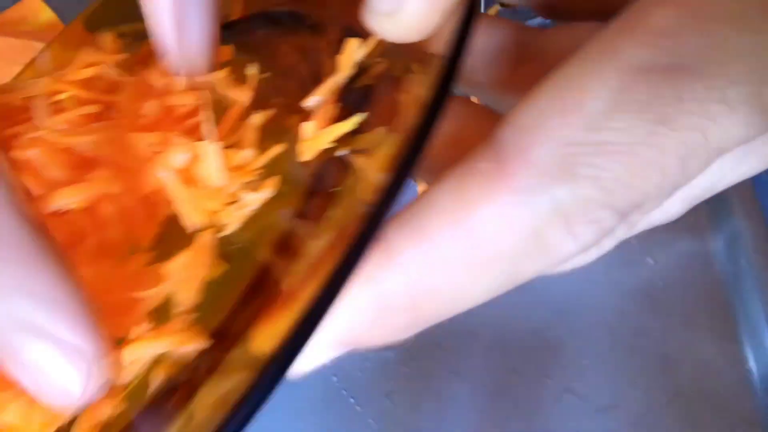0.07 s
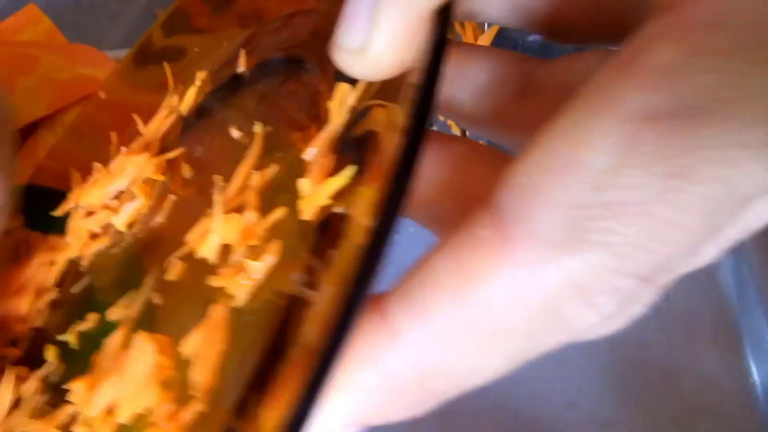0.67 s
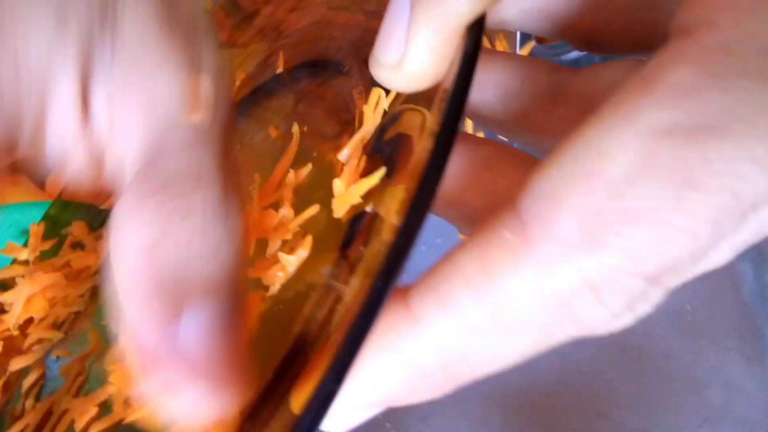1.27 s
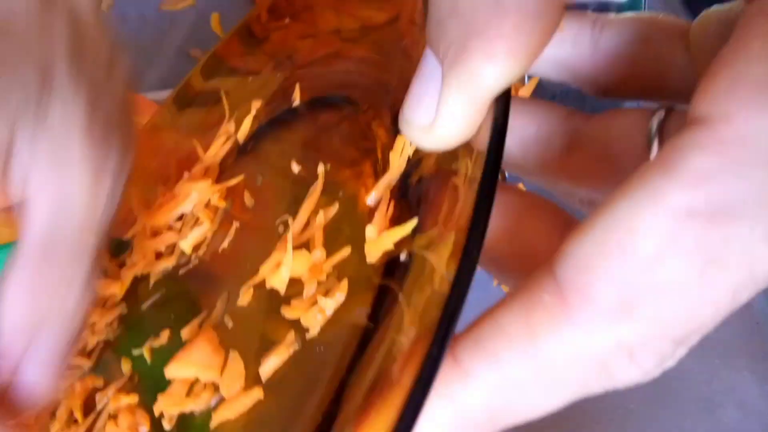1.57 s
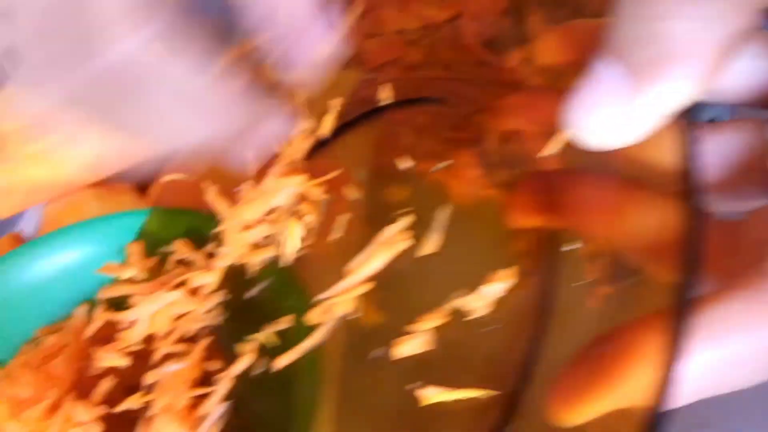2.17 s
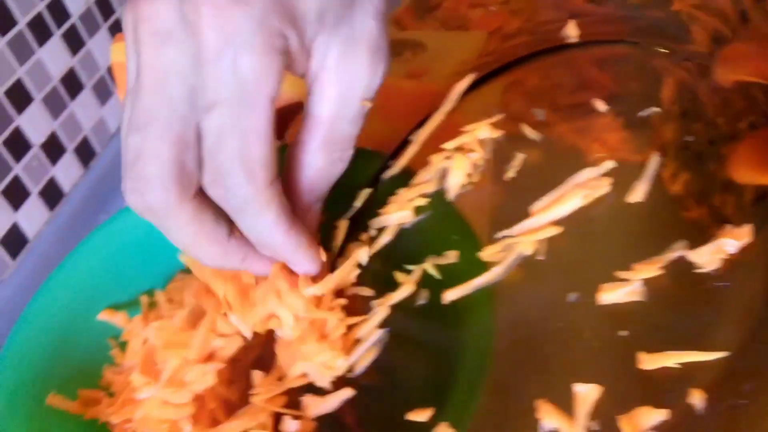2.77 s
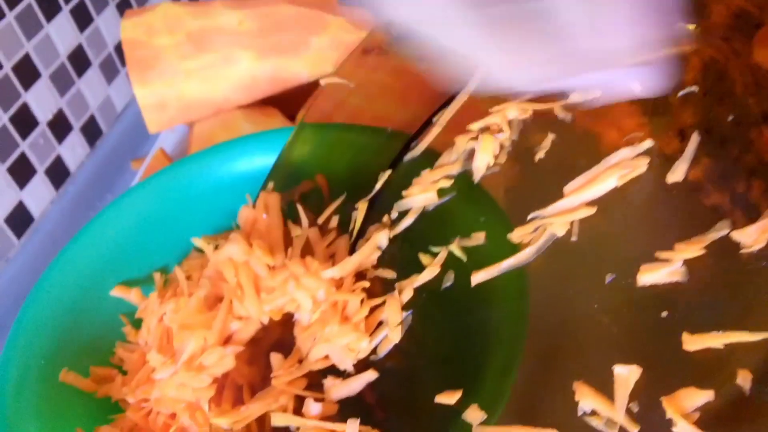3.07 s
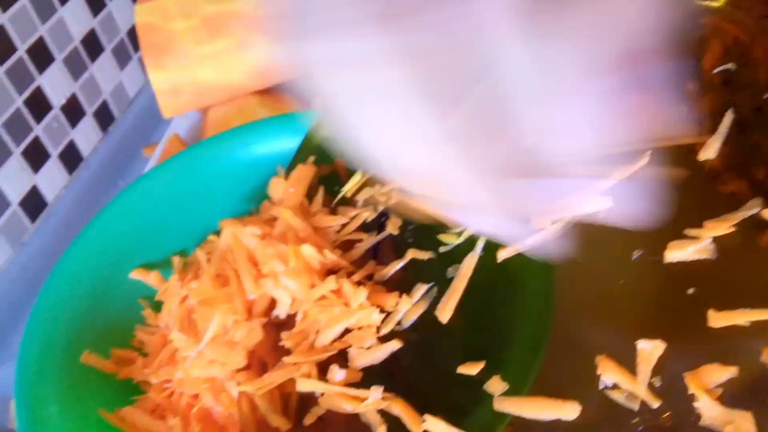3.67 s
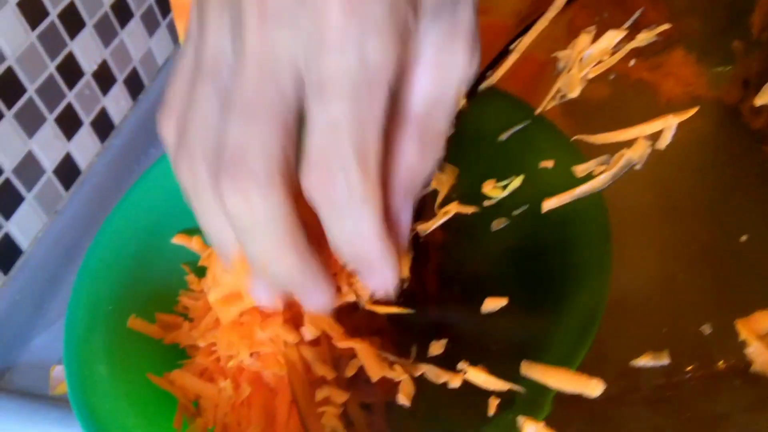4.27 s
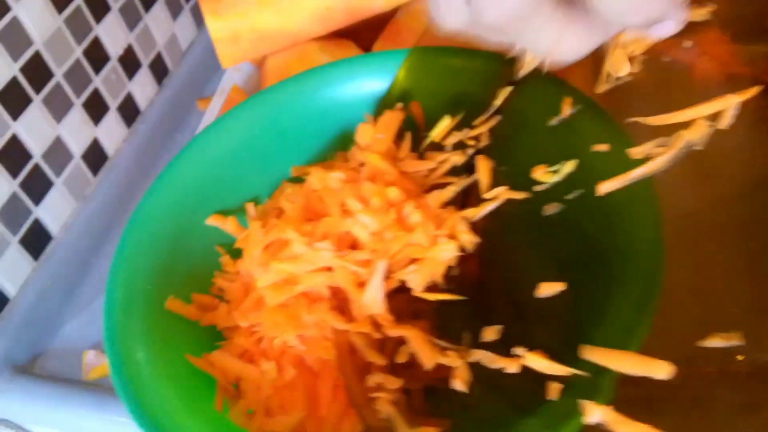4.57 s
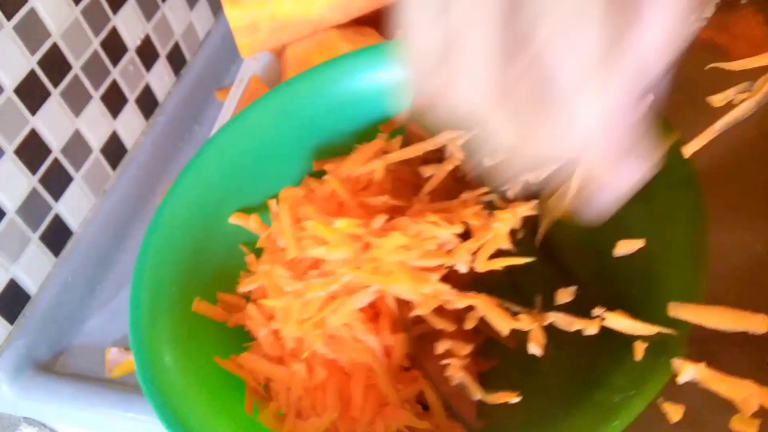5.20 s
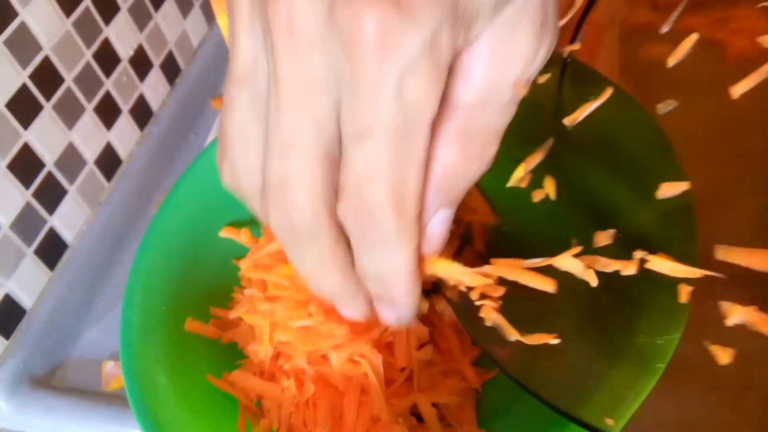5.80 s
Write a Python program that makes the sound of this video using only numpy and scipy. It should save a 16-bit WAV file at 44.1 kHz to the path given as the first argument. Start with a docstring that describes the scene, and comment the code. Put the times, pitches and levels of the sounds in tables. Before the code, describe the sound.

Glass bowl clatters and scrapes, then knocks lightly on a plastic bowl as wet fingers wipe out grated vegetable.

```python
"""Scooping grated pumpkin between bowls.

In a small tiled kitchen, a hand scoops grated pumpkin from a tilted glass bowl into a plastic one,
where it lands with a soft thud. The glass is shifted with a clatter and a squealing scrape, knocks
on the plastic, and rings faintly as wet fingers wipe it. A thin whistle rises and falls at the end,
over quiet room noise."""
import sys
import numpy as np
from scipy import signal
from scipy.fft import rfft, irfft, next_fast_len
from scipy.io import wavfile
from scipy.ndimage import uniform_filter1d, map_coordinates

SR = 44100
rng = np.random.default_rng(int(sys.argv[2]) if len(sys.argv) > 2 else 0)


def wrap_up_sound(samples):
    """Save the sound to the file named by the first command line argument, as 16-bit audio."""
    columns = np.atleast_2d(samples).T
    # keep every value between -1 and 1, then stretch to whole-number steps
    tamed = np.clip(columns, -1, 1)
    steps = np.round(tamed * 32767).astype(np.int16)
    wavfile.write(sys.argv[1], SR, steps)


N = 266319
TIME_S = np.arange(N) / SR
AGE_S = np.arange(SR // 3) / SR  # time within one impact


def amp(db):
    """Decibels to gain."""
    return 10 ** (np.asarray(db) / 20)


def unit_rms(x):
    """x at rms 1."""
    return x / np.sqrt(np.mean(x ** 2) + 1e-20)


def unit_hit(x):
    """x with the energy of 10 ms at rms 1."""
    return x / np.sqrt(np.sum(x ** 2) / (SR / 100) + 1e-20)


def log_interp(points, hz):
    """(f/Hz, value) points read on a log frequency axis."""
    point_hz, values = np.transpose(points)
    return np.interp(np.log(hz + 1), np.log(point_hz + 1), values)


def wobble(knots_per_s):
    """Smooth random curve."""
    knots = rng.standard_normal(int(N * knots_per_s / SR) + 4)
    return map_coordinates(knots, [TIME_S * knots_per_s])


def filtered(x, gain):
    """x through a minimum-phase filter of magnitude gain(hz)."""
    size = 2 * next_fast_len(len(x) // 2 + 4096)
    magnitude = np.maximum(gain(np.fft.rfftfreq(size, 1 / SR)), 1e-6)
    cepstrum = irfft(np.log(magnitude))
    cepstrum[1:size // 2] *= 2
    cepstrum[size // 2 + 1:] = 0
    return irfft(rfft(x, size) * np.exp(rfft(cepstrum)))[:len(x)]


def coloured(x, spectrum):
    """x through an (f/Hz, gain/dB) curve."""
    return filtered(x, lambda hz: amp(log_interp(spectrum, hz)))


def focused(x, centre_hz, width_oct):
    """Place and hardness of a contact favour one band of x."""
    def gain(hz):
        offset = np.log2((hz + 1) / centre_hz) / (1.135 * width_oct)
        return amp(-28) + 1 / (1 + offset ** 2)
    return filtered(x, gain)


def ring(modes, scatter_db, blur_hz):
    """Damped modes, new in strength at each hit; shifting grip and wet shreds blur their pitch."""
    hz, db, t60_s = np.transpose(modes)[:, :, None]
    level_db = db + scatter_db * rng.standard_normal(hz.shape)
    walk = np.cumsum(rng.standard_normal((len(modes), len(AGE_S))), axis=1)
    drift = uniform_filter1d(walk * np.sqrt(2 * np.pi * blur_hz / SR), size=120, axis=1)
    phase = 2 * np.pi * (hz * AGE_S + rng.random(hz.shape)) + drift
    return unit_hit(np.sum(amp(level_db - 60 * AGE_S / t60_s) * np.sin(phase), axis=0))


def burst(t60_s):
    """Decaying puff of noise."""
    return unit_hit(rng.standard_normal(len(AGE_S)) * amp(-60 * AGE_S / t60_s))


def friction(rough_db, slips_per_s):
    """Stick-slip noise."""
    return unit_rms(rng.standard_normal(N) * amp(rough_db * wobble(slips_per_s)))


def stroke(start_s, attack_s, hold_s, release_s, db):
    """Gain of one movement: up 23 dB over the attack, held, then down 23 dB per release time."""
    before = (start_s + attack_s - TIME_S) / attack_s
    after = (TIME_S - start_s - attack_s - hold_s) / release_s
    return amp(db - 23 * np.maximum(np.maximum(before, after), 0))


def add_hit(track, t_s, db, sound):
    """Mix in one impact, normalised to db."""
    part = track[round(t_s * SR):][:len(sound)]
    part += amp(db) * unit_hit(sound)[:len(part)]


# Contact spectrum: f/Hz, gain/dB
CONTACT_EQ = [(150, -18.5), (500, -5), (900, 1), (1700, 3.5), (2700, 0), (4000, 1), (6300, 2),
              (7200, -10.5), (8200, -30.5), (11000, -47.5), (16000, -39)]

def on_glass(excitation):
    """Hard glass gives a hit or a rub its bright spectrum."""
    return coloured(excitation, CONTACT_EQ)


# Noise spectrum: f/Hz, relative density/dB
ROOM_SPECTRUM = [(15, -36), (25, -11.5), (75, -4), (133, -2), (204, -4.5), (227, -7), (289, -1.5),
                 (322, -8), (523, -9), (666, -11), (804, -11), (1170, -14), (5880, -16.5), (7700, -25.5),
                 (15500, -31.5)]

def room_noise():
    """Steady, quiet hush."""
    return amp(-64) * unit_rms(coloured(rng.standard_normal(N), ROOM_SPECTRUM))


# Room decay: f/Hz, t60/s
ROOM_DECAY = [(150, 0.2), (600, 0.33), (2000, 0.29), (5500, 0.24), (9000, 0.14)]
# Reverb spectrum: f/Hz, gain/dB
REVERB_EQ = [(150, 1.5), (500, -6.5), (1200, -12), (3000, -12), (6000, -11), (9000, -3.5)]

def kitchen_reverb(x):
    """Tiles return a short tail and one early wall reflection."""
    hz, t_s, spectra = signal.stft(rng.standard_normal(SR // 2), SR, nperseg=256)
    decay = amp(-60 * t_s / log_interp(ROOM_DECAY, hz)[:, None])
    tail = signal.istft(spectra * decay, SR, nperseg=256)[1]
    tail *= 1 - np.exp(-np.arange(len(tail)) / SR / 0.002)
    tail /= np.linalg.norm(tail)
    tail[round(.0225 * SR)] += .35  # wall reflection
    return signal.fftconvolve(x, coloured(tail, REVERB_EQ))[:N]


def whistle(peak_s=5.845, half_length_s=.31, peak_hz=1559, peak_db=-57, fade_db_per_oct=60):
    """Thin, hoarse tone, strongest on its second harmonic; one swell lifts pitch and level."""
    offset = (TIME_S - peak_s) / half_length_s
    sag_oct = .9 * (1 - np.exp(-offset ** 2))
    hz = peak_hz / 2 ** sag_oct * (1 + 0.0099 * wobble(400))
    phase = 2 * np.pi * np.cumsum(hz) / SR
    tone = sum(amp(db) * np.sin(k * phase) for k, db in enumerate([-21, 0, -25], 1))
    level_db = peak_db - fade_db_per_oct * sag_oct + 2.9 * wobble(60)
    gate = np.clip(2 - abs(offset), 0, 1)
    return gate * amp(level_db) * unit_rms(tone)


# Thud spectrum: f/Hz, relative density/dB
THUD_SPECTRUM = [(29, -87), (50, -33.5), (146, -9), (182, -1.5), (252, -24), (378, -18.5), (429, -29),
                 (500, -20.5), (650, -55), (1100, -120)]

def pumpkin_thud():
    """A soft handful slumps into the plastic bowl."""
    envelope = stroke(start_s=.81, attack_s=.115, hold_s=.01, release_s=.11, db=-44)
    return envelope * unit_rms(coloured(rng.standard_normal(N), THUD_SPECTRUM))


# Wiped-glass resonances: f/Hz, half width/Hz, gain/dB
WIPE_RESONANCES = [(1428.7, 40.91, -3.5), (2300, 21.707, 0.5), (3545, 35, -6), (3697, 44, -9.5),
                   (4170, 49, -26.5), (4860, 46, 1), (5780, 40, -34), (6160, 34, -14.5), (6332, 38, -3)]

def wiped_glass(excitation):
    """The bowl resonates in narrow bands under a finger."""
    def gain(hz):
        peaks = sum(amp(db) / (1 + ((hz - mode_hz) / width_hz) ** 2)
                    for mode_hz, width_hz, db in WIPE_RESONANCES)
        return amp(-22.5) + peaks
    return filtered(on_glass(excitation), gain)


# Wipes: peak t/s, half length/s, level/dB, centre f/Hz, width/oct
FINGER_WIPES = [(.488, 0.065, -66, 1360, .8), (1.58, 0.0552, -66.5, 5500, 1.6),
                (1.928, .035, -68, 2300, 0.66), (2.023, 0.043, -56, 3630, 1.1),
                (2.735, 0.041, -66, 2600, 0.57), (3.431, 0.056, -53, 3300, 1.5),
                (4.163, 0.062, -58, 5300, 0.85), (4.75, 0.088, -59.5, 3000, 0.59),
                (5.383, 0.1, -54, 3250, .46)]
# Fingertip catches: t/s, level/dB, centre f/Hz, width/oct
FINGER_CATCHES = [(3.215, -59, 3530, .15), (3.4953, -47, 4800, 0.13), (4.1195, -49.5, 6230, 0.88),
                  (4.621, -58, 2540, 0.37), (4.679, -58, 3000, 0.62), (5.2969, -44.5, 5500, 2)]

def wet_fingers():
    """Fingers wipe shreds off the glass and catch now and then."""
    rubbing = wiped_glass(friction(rough_db=4, slips_per_s=110))
    out = np.zeros(N)
    for t_s, half_s, db, centre_hz, width_oct in FINGER_WIPES:
        touch = abs(TIME_S - t_s) < 3 * half_s
        pressure = np.exp(-((TIME_S[touch] - t_s) / half_s) ** 2)
        out[touch] += amp(db) * pressure * unit_rms(focused(rubbing[touch], centre_hz, width_oct))
    skin_onset = 1 - np.exp(-AGE_S / 0.0017)
    for t_s, db, centre_hz, width_oct in FINGER_CATCHES:
        catch = wiped_glass(burst(t60_s=0.02293) * skin_onset)
        add_hit(out, t_s, db, focused(catch, centre_hz, width_oct))
    return out


DRAG_START_S, DRAG_ATTACK_S, DRAG_HOLD_S, DRAG_RELEASE_S, DRAG_DB = .66, .1247, .13, .34, -49.7
DRAG_GAIN = stroke(DRAG_START_S, DRAG_ATTACK_S, DRAG_HOLD_S, DRAG_RELEASE_S, DRAG_DB)
# Wet slips: t/s, length/s, level/dB, start f/Hz, end f/Hz, pitch jitter/fraction
GLASS_SLIPS = [(0.814, .45, -52, 3740, 3330, 0.0184), (4.829, .16, -66, 5150, 4900, .014),
               (5.11, 0.095, -69, 6597, 6447, .016), (5.376, 0.11, -51.5, 4100, 3500, .035)]

def glass_drag():
    """Glass scrapes over the plastic rim; wet squeals sag in pitch as each slip slows."""
    out = DRAG_GAIN * unit_rms(on_glass(friction(rough_db=1, slips_per_s=480)))
    jitter = wobble(700)
    grip = unit_rms(amp(4.188 * wobble(90)))
    for t_s, length_s, db, start_hz, end_hz, jitter_depth in GLASS_SLIPS:
        slipping = (TIME_S > t_s) & (TIME_S < t_s + length_s)
        progress = (TIME_S[slipping] - t_s) / length_s
        hz = start_hz + (end_hz - start_hz) * progress ** 2.3
        hz *= 1 + jitter_depth * jitter[slipping]
        tone = unit_rms(np.sin(2 * np.pi * np.cumsum(hz) / SR))
        attack_s, release_s = 0.063 * length_s, 0.46 * length_s
        envelope = stroke(t_s, attack_s, length_s - attack_s - release_s, release_s, db) * grip
        out[slipping] += envelope[slipping] * tone
    return out


def settling_ticks(ticks_per_s=24, over_drag_db=3, mid_hz=1394.4, width_oct=1):
    """Light random contacts that follow the drag's level, as rows for the clatter."""
    end_s = DRAG_START_S + DRAG_ATTACK_S + DRAG_HOLD_S + DRAG_RELEASE_S
    ticks = []
    for slot, (delay, place) in enumerate(rng.random((40, 2))):
        t_s = DRAG_START_S + (slot + delay) / ticks_per_s
        if t_s < end_s:
            db = 20 * np.log10(DRAG_GAIN[round(t_s * SR)]) + over_drag_db
            ticks.append((t_s, db, mid_hz * 2 ** (place - .5), width_oct))
    return ticks


# Modes of the whole plastic bowl, its wall, and the glass: f/Hz, relative level/dB, t60/s
FLEX_MODES = [(140, -15, 0.19), (180, 2, 0.093), (296.6, -2.5, 0.14), (351, -3, 0.11), (443, -7, 0.08),
              (535, -4, 0.12)]
WALL_MODES = [(390, -3, 0.039), (513, -8.5, 0.047), (794, -5.5, 0.031), (884, 5, 0.022), (1010, 0, 0.025),
              (1221.8, -3, 0.023), (1640, -0.5, 0.038)]
GLASS_MODES = [(1416, -8, .07), (2272, -8, 0.22), (3490, -12, 0.13), (3686, -5.5, 0.068),
               (4700, -3, 0.01979), (4870, -4.5, 0.036), (5200, -18.5, 0.032), (5790.3, -4, 0.043),
               (6300, -23, .045), (6490, -13, 0.039), (6980, 0.5, 0.035), (8110, 10.5, 0.031)]
# Knocks: t/s, tock level/dB, tock centre f/Hz, chink level/dB, chink centre f/Hz, chink width/oct
BOWL_KNOCKS = [(1.921, -60, 500, -76, 4900, .3), (2.0101, -52, 860, -57, 5600, .77),
               (2.2953, -41, 560, -41, 6000, 0.2), (2.955, -44, 650, -43.5, 5720, 0.14),
               (4.7145, -31, 656, -27, 5060, 0.24), (5.2268, -54, 686, -47.5, 4720, 0.084),
               (5.349, -36.5, 830, -32.5, 4680, 0.17), (5.4544, -42, 720, -38.5, 5500, 0.78)]

def bowl_knocks():
    """Each knock sounds both bowls: boom and hollow tock from the plastic, chink from the glass."""
    out = np.zeros(N)
    # Soft plastic dulls the contact: f/Hz, gain/dB
    plastic_eq = [(60, -14.5), (300, 6.5), (1700, 2.0), (2600, 7), (8000, -47), (12000, -90)]
    shred_cushion = 1 - np.exp(-AGE_S / 0.00049)
    for t_s, tock_db, tock_hz, chink_db, chink_hz, width_oct in BOWL_KNOCKS:
        boom = ring(FLEX_MODES, scatter_db=2, blur_hz=21.793) * (1 - np.exp(-AGE_S / 0.0031))
        wall = ring(WALL_MODES, scatter_db=3.5, blur_hz=36.2) + amp(2) * burst(t60_s=0.031)
        glass = ring(GLASS_MODES, scatter_db=4, blur_hz=28) + amp(-3) * burst(t60_s=0.032)
        tock = coloured(shred_cushion * wall, plastic_eq)
        chink = on_glass(shred_cushion * glass)
        add_hit(out, t_s, tock_db - 10, boom)
        add_hit(out, t_s, tock_db, focused(tock, tock_hz, width_oct=0.92))
        add_hit(out, t_s, chink_db, focused(chink, chink_hz, width_oct))
    return out


# Rim modes: f/Hz, relative level/dB, t60/s
RIM_MODES = [(912, -1, 0.043), (1513, -5.5, 0.038), (1791, 0, 0.023), (2210, -6.5, 0.028),
             (3200, -17, 0.034), (3638.7, -2, 0.01324), (4750, -17, 0.022)]
# Hard contacts: t/s, level/dB, centre f/Hz, width/oct
GLASS_CLACKS = [(.6871, -43.5, 4300, .3), (0.7214, -32, 1780, 0.99), (.756, -44, 1410, 1.6),
                (.763, -36, 2600, 0.71), (0.7743, -23, 3880, 0.89), (0.7907, -28, 5800, 1.4),
                (.861, -44.5, 3400, 1.5), (0.8984, -37, 2967, .11), (0.9676, -31.5, 3670, 1.5),
                (.974, -41, 2500, 2.8), (1.047, -44, 990, .4), (1.057, -37.5, 2800, 0.764),
                (1.091, -43.5, 2100, 2.3), (1.1044, -46.5, 1400, 0.85), (1.1686, -52, 1234, 0.28),
                (5.2691, -44.5, 1590, 0.39)]

def glass_clatter():
    """Contacts of the shifted bowl: a snap, a rim clack and a rattle that dies sooner when brighter."""
    out = np.zeros(N)
    snap = unit_hit(signal.unit_impulse(len(AGE_S)))
    for t_s, db, centre_hz, width_oct in GLASS_CLACKS + settling_ticks():
        rattle = burst(t60_s=0.031 * (1000 / centre_hz) ** 0.61)
        rim = amp(-5) * ring(RIM_MODES, scatter_db=1.5, blur_hz=50)
        add_hit(out, t_s, db, focused(on_glass(snap + rattle + rim), centre_hz, width_oct))
    return out


def scene():
    """Bowls and hands close by; the whistle farther off, with more reverb."""
    near = glass_clatter() + bowl_knocks() + wet_fingers() + glass_drag()
    far = whistle()
    hush = room_noise()
    thud = pumpkin_thud()
    reverb = kitchen_reverb(near + amp(11.5) * far)
    return (hush + reverb + far + thud + near)[None]


def record(dry, cutoff_hz=15800):
    """Microphone band limit."""
    size = next_fast_len(N + SR // 2)
    passband = np.fft.rfftfreq(size, 1 / SR) < cutoff_hz
    return irfft(rfft(dry, size) * passband, size)[:, :N]


dry = scene()
out = record(dry)
wrap_up_sound(out)
```